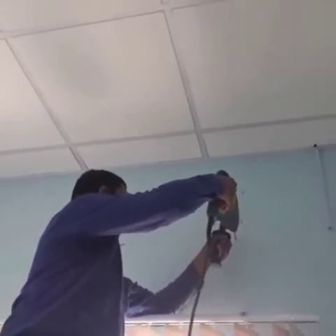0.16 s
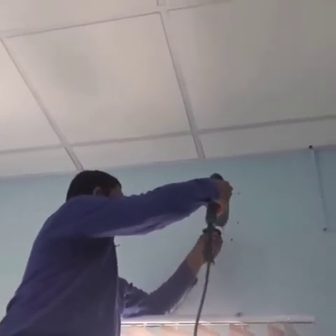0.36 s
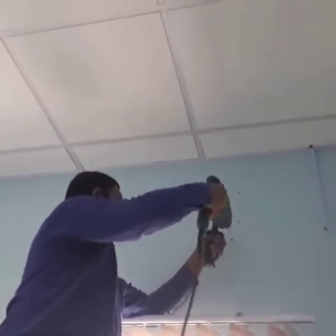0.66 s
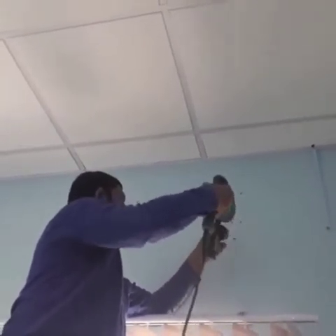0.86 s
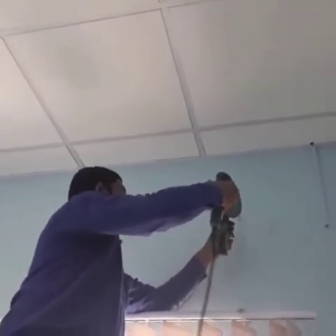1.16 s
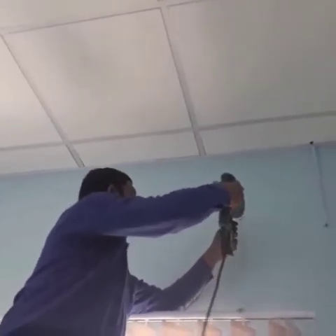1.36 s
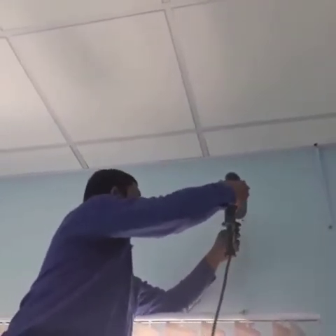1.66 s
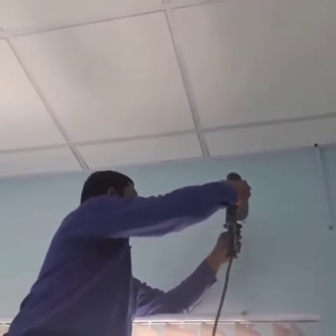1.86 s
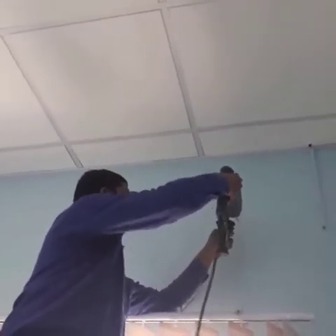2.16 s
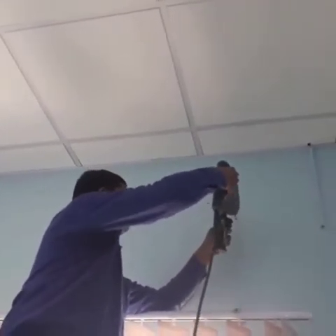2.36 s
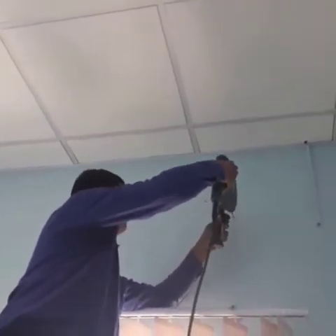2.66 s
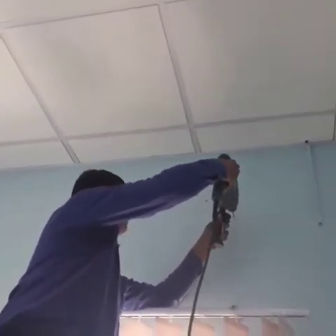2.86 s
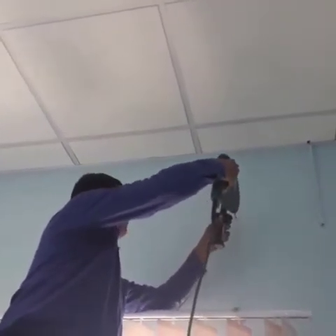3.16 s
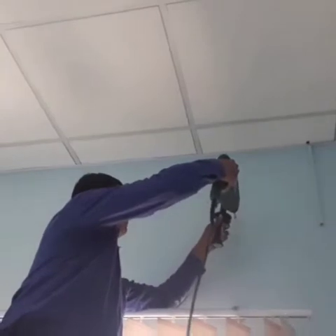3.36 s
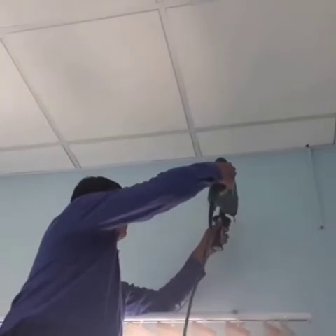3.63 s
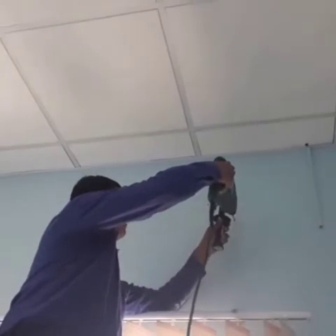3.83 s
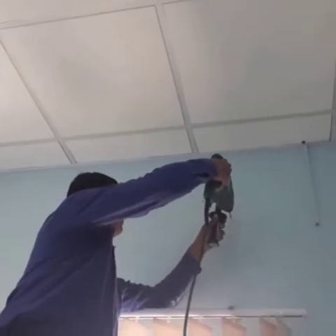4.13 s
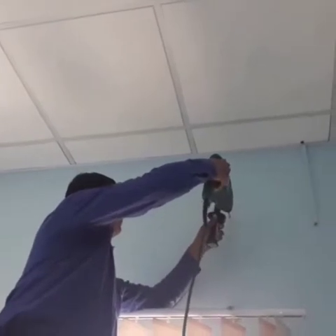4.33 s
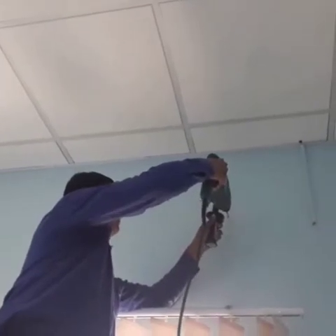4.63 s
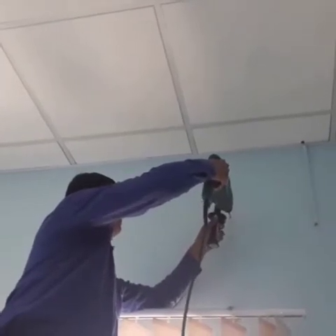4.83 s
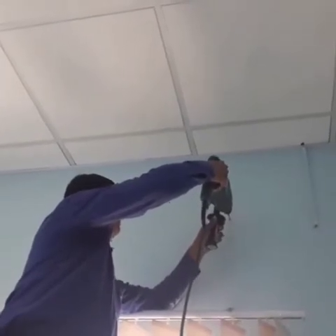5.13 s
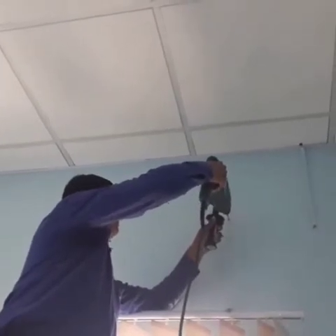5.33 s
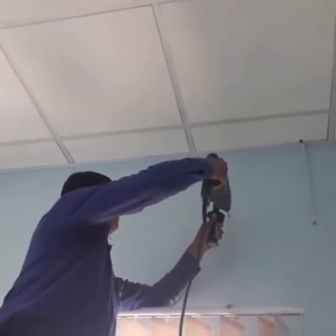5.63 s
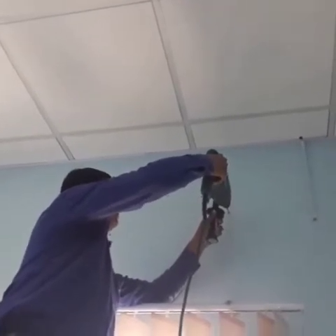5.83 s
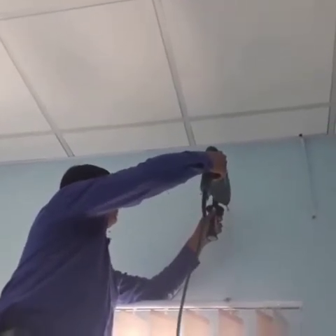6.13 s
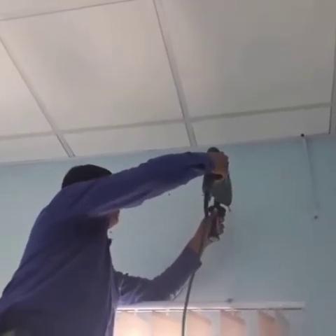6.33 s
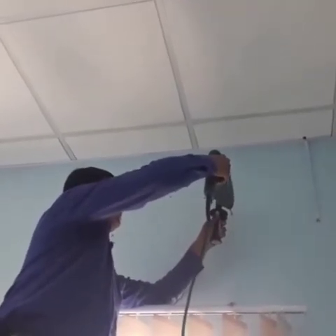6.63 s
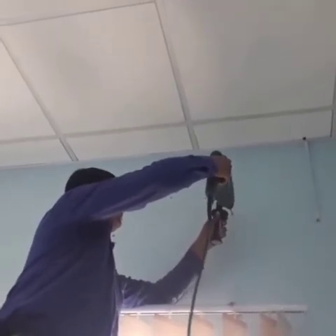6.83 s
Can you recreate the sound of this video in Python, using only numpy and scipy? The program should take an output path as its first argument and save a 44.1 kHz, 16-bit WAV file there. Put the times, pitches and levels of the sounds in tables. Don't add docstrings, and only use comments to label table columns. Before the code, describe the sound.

In a bare, reverberant room, a power drill coasts to a stop, scrapes and knocks, then restarts with rapid trigger squeezes and gritty grinding.

```python
import sys
import numpy as np
from scipy import signal
from scipy.fft import rfft, irfft, next_fast_len
from scipy.io import wavfile
from scipy.ndimage import uniform_filter1d

SR = 44100
rng = np.random.default_rng(int(sys.argv[2]) if len(sys.argv) > 2 else 0)


def elevation(decibels):
    levels = np.asarray(decibels, float)
    return 10 ** (levels / 20)


def unload_wav(signal):
    wavfile.write(
        sys.argv[1],
        SR,
        np.round(np.clip(np.atleast_2d(signal).T, -1, 1) * 32767).astype(np.int16),
    )


N = 308259
TIME = np.arange(N) / SR
GRIT_SPLIT_HZ = 6500

# freq_hz, level_db
HOUSING_SPECTRUM = [(35, -63), (60, -27), (227, -16.5), (269, -18.5), (311, -12.5), (427, -12.5),
                    (477, -11.5), (690, -6.5), (815, -12.5), (894, -4), (1740, 0), (2620, -5.5),
                    (5000, -17.5), (6500, -36), (11000, -120)]


def unit(x):
    return x / np.sqrt(np.mean(x ** 2))


def colour(x, points):
    hz, db = np.transpose(points)
    size = next_fast_len(len(x))
    f = np.maximum(np.fft.rfftfreq(size, 1 / SR), 1)
    gain = elevation(np.interp(np.log(f), np.log(hz), db))
    return irfft(rfft(x, size) * gain, size)[:len(x)]


def ring(x, hz, width_hz):
    return signal.lfilter(*signal.iirpeak(hz, hz / width_hz, fs=SR), x)


def split(x, hz, kind):
    return signal.sosfilt(signal.butter(4, hz, kind, fs=SR, output="sos"), x)


def walk(rate):
    k = int(SR / rate)
    steps = np.repeat(rng.standard_normal(N // k + 1), k)
    return unit(uniform_filter1d(uniform_filter1d(steps, k), k)[:N])


def grains(spread_db):
    size_db = spread_db * np.minimum(rng.exponential(size=N), 5)
    return unit(rng.standard_normal(N) * elevation(size_db))


def lag(x, seconds):
    share = 1 / (seconds * SR)
    return signal.lfilter([share], [1, share - 1], x - x[0]) + x[0]


def by_speed(hz, table):
    at_hz, *rest = np.transpose(table)
    return [np.interp(np.log(hz), np.log(at_hz), column) for column in rest]


def coast(start_hz, t):
    friction_hz_per_s, drag_per_s = 2750, .53
    rest = friction_hz_per_s / drag_per_s
    return np.maximum((start_hz + rest) * np.exp(-drag_per_s * t) - rest, 1)


def speed():
    # on_s, off_s, reached_hz, spin_up_s
    pulls = [(3.01, 3.074, 702, 0.24), (3.074, 3.273, 5800, .021), (3.855, 4.092, 6510, 0.083),
             (4.476, 4.635, 8660, 0.0599), (4.833, 4.945, 9180, .04), (5.115, 5.255, 9630, 0.065),
             (5.336, 5.5, 10200, .15), (5.62, 5.765, 10360, 0.076), (5.876, 6.019, 10290, .1),
             (6.155, 6.285, 9940, 0.069), (6.4, 6.579, 10150, .14), (6.662, 6.805, 10140, 0.11),
             (6.907, 7.05, 9800, 0.073)]
    hz, powered = coast(4900, TIME), np.zeros(N)
    for on, off, top, rise in pulls:
        before = hz[int(on * SR)]
        progress = np.expm1(-np.maximum(TIME - on, 0) / rise) / np.expm1(-(off - on) / rise)
        climb = before + (top - before) * progress
        after = np.where(TIME < off, climb, coast(top, TIME - off))
        hz = np.where(TIME < on, hz, after)
        powered[(TIME >= on) & (TIME < off)] = 1
    return uniform_filter1d(hz, 1500), lag(powered, 0.056)


def motor(hz):
    # whine_hz, level_db
    whine_out = [(4000, -39), (4550, -31), (5750, -23.5), (6350, -24.5), (7300, -22), (8400, -15.5),
                 (9250, -20.5), (10200, -23.5)]
    bar_count, sideband_db = 24, -7
    mesh_ratio, mesh_db = .419, -7
    strain_db, strain_hz_per_s = -1, 21000
    strain = np.clip(np.gradient(hz) * SR / strain_hz_per_s, 0, 1)
    gain = elevation(by_speed(hz, whine_out)[0] - 1.0 + strain_db * strain)
    gain = gain * np.minimum(hz / whine_out[0][0], 1) ** 2
    bars = 2 * np.pi * np.cumsum(hz) / SR
    shaft = bars / bar_count
    shiver = 2 * np.pi * np.cumsum((40 + hz * .005) * walk(rate=300)) / SR
    sidebands = 1 + 2 * elevation(sideband_db) * np.cos(shaft)
    whine = elevation(3.2 * walk(rate=120)) * np.sin(bars + shiver) * sidebands
    mesh_gain = elevation(mesh_db + 2.0 * walk(rate=120)) * np.clip(hz / 9000, .8, 2) ** 3
    mesh = mesh_gain * np.sin(mesh_ratio * (bars + 1.9 * shiver))
    return np.sqrt(2) * gain * (whine + mesh), shaft


def body(x, air_db):
    # freq_hz, width_hz, level_db
    modes = [(821, 45, -14.5), (1556, 32, -20.5), (1795, 140, -12), (2130, 170, -17.5), (3560, 140, -23),
             (8750, 210, -19)]
    total = 0
    for hz, width_hz, db in modes:
        level_db = db + 1.2 * walk(rate=16) + (hz > GRIT_SPLIT_HZ) * air_db
        total = total + elevation(level_db) * unit(ring(x, hz, width_hz))
    return total


def drill_noise(shaft, hz, powered):
    # commutator_hz, clatter_db, grit_over_clatter_db, air_over_clatter_db
    noise_levels = [(12, -80, -4, -8), (407, -44, -6.5, -14), (1380, -28, -7.5, -14), (3340, -24.5, -3, -6),
                    (4640, -21, 0, -3.5), (6000, -18, 0, -1), (9900, -17, 0, 2)]
    # time_s, noise_change_db
    lean = [
        (4.45, -.5),
        (4.62, 1),
        (5.05, 0),
        (5.26, 1.5),
        (5.45, 0),
        (5.85, -1),
        (6.13, -1),
        (6.5, -1),
        (6.77, 0.5),
        (6.99, 0),
    ]
    # time_s, clatter_change_db
    jolts = [
        (.025, 1),
        (.075, -14),
        (.318, -9),
        (.41, 4),
        (3.57, 5),
        (4.48, -2),
    ]
    # time_s, treble_change_db, half_length_s
    slack = [(.06, -7, 0.01), (0.24, -3, 0.01), (0.298, 1.5, 0.011), (0.375, -1, .014),
             (0.542, -9.5, 0.017), (0.812, -7, 0.015), (0.957, -1, .02), (1.055, -5, 0.022),
             (3.661, -2, 0.018), (3.728, -9, 0.011), (4.213, -2, 0.01)]
    # freq_hz, level_db
    treble = [(1180, -41), (2000, -0.5), (2310, -6), (2570, -4.5), (2920, -6), (3420, -4), (4280, -6.5),
              (5100, -7.5), (7830, -3), (8640, 1), (9600, -5.5), (10900, -4), (12100, -9), (15800, -43),
              (22000, -120)]
    jolt_s = 0.011
    clatter_db, grit_db, air_db = by_speed(lag(hz, 0.023), noise_levels)
    clatter_db = clatter_db + np.interp(TIME, *np.transpose(lean))
    jolt = elevation(sum(db * np.exp(-((TIME - s) / jolt_s) ** 2) for s, db in jolts))
    teeth = grains(spread_db=2.5) * (1 + 0.22 * np.cos(shaft))
    clatter = unit(colour(teeth, HOUSING_SPECTRUM)) * elevation(0.55 * walk(rate=17))
    high = colour(grains(spread_db=2.0) * (1 + 0.022 * np.cos(shaft)), treble)
    slack_db = sum(db * np.exp(-((TIME - s) / half_s) ** 2) for s, db, half_s in slack)
    chatter_db = slack_db + 0.93 * walk(rate=45)
    grit = unit(split(high, GRIT_SPLIT_HZ, "low")) * elevation(grit_db + 1.0 + chatter_db)
    air_level_db = air_db - 2.5 + chatter_db + 0.84 * walk(rate=50)
    air = unit(split(high, GRIT_SPLIT_HZ, "high")) * elevation(air_level_db)
    shaken = jolt * (clatter + body(teeth, air_db))
    level = elevation(clatter_db - 0.5 + 0.2 * powered)
    return level * (hz > 2) * (shaken + grit + air)


def background():
    # freq_hz, level_db
    tone_spectrum = [(15, -30), (30, -11), (70, -13), (130, -4.5), (250, -5.5), (420, -12), (900, -23.5),
                     (1600, -23), (3000, -26), (12100, -39.5), (16000, -80)]
    # freq_hz, width_hz, level_db
    fan = [(103, 5.4, -60.5), (169, 9.9, -61), (213, 7.7, -59.5), (502, 2.8, -63.5), (637, 7.2, -64)]
    tone_db = -50.5 + 1 + 1.2 * walk(rate=2.1)
    tone = elevation(tone_db) * unit(colour(rng.standard_normal(N), tone_spectrum))
    hum = sum(elevation(db) * unit(ring(rng.standard_normal(N), hz, width_hz)) for hz, width_hz, db in fan)
    phase = 2 * np.pi * 160.5 * TIME + .5 * walk(rate=8)
    return tone + hum + elevation(-50 + 1.7 * walk(rate=15)) * np.sin(phase)


def scraping():
    # start_s, held_s,
    # level_db, treble_over_level_db
    scrapes = [(1.085, 0.033, -40, -10), (1.2, 0.23, -52, -0.5), (1.488, 0.045, -42.5, -9.5),
               (1.81, .02, -53, 1), (1.836, 0.049, -44.5, -6), (1.925, 0.016, -52.5, 8.5),
               (2.0, .95, -59.5, 1), (2.15, 0.16, -57.5, 3), (2.32, 0.029, -53, 6), (2.42, 0.047, -46, -3),
               (2.555, 0.041, -49, -5), (2.617, .2, -48, 9.5), (2.95, .02, -52, -15), (3.012, .01, -50, -3),
               (3.044, .02, -53, 10)]
    rise_s, fall_db_per_s = 0.0062, 106
    low, top = 0, 0
    for s, held_s, db, treble_db in scrapes:
        fade_db = -fall_db_per_s * np.maximum(TIME - s - held_s, 0)
        power = (np.clip((TIME - s) / rise_s, 0, 1) * elevation(db + fade_db)) ** 2
        low = low + power
        top = top + power * elevation(2 * treble_db)
    return np.sqrt(low), np.sqrt(top)


def handling():
    # freq_hz, level_db
    scrape_spectrum = [(1470, -2.5), (2500, 3), (2800, -9), (2930, -13), (4270, -7), (4530, -5), (6920, 2),
                       (8950, 0.5), (9690, -6), (11100, -0.5), (12100, -7), (15800, -37), (22000, -120)]
    # time_s, peak_db, ring_db
    taps = [
        (1.491, -32, -40),
        (1.835, -28, -45),
        (1.929, -33, -43.5),
        (2.415, -34, -58),
        (2.627, -28, -40),
    ]
    low, top = scraping()
    rub = grains(spread_db=2.5)
    rub_body = unit(colour(rub, HOUSING_SPECTRUM)) + elevation(-9) * unit(ring(rub, 821, 27))
    scrape = low * rub_body + top * unit(colour(rub, scrape_spectrum))
    blows, rung = np.zeros(N), np.zeros(N)
    t = np.arange(SR // 2) / SR
    pair = np.sin(2 * np.pi * 828 * t) + 0.35 * np.sin(2 * np.pi * 790 * t)
    panel = pair * elevation(-2.5 - 60 * t / 0.4) * np.minimum(t / .004, 1)
    for s, db, ring_db in taps:
        i = int(s * SR)
        burst = np.exp(-t / 0.0034) * rng.standard_normal(len(t))
        blows[i:i + len(t)] += elevation(db) * burst / np.max(np.abs(burst))
        rung[i:i + len(t)] += elevation(ring_db) * panel
    return elevation(-3.5) * scrape + elevation(3.5) * ring(blows, 1800, 2700) + rung


def tail():
    t60_s, top_t60_s = .55, .3
    wet_db, wet_top_db = -4, -7
    t = np.arange(SR // 2) / SR
    noise = rng.standard_normal(SR // 2)
    low = split(noise, 2720, "low")
    low_part = low * elevation(-60 * t / t60_s) * np.sqrt(2 * np.log(1000) / t60_s / SR)
    top_decay = elevation(wet_top_db - 60 * t / top_t60_s)
    top_part = (noise - low) * top_decay * np.sqrt(2 * np.log(1000) / top_t60_s / SR)
    return elevation(wet_db) * (low_part + top_part) * np.minimum(t / 0.0031, 1)


def room(x):
    sway = 2.5 * walk(rate=5)
    lead = SR // 2
    wet = 0
    for share in (np.cos(sway), np.sin(sway)):
        sent = x * share
        path = np.r_[sent[lead:0:-1], sent]
        wet = wet + signal.fftconvolve(path, tail())[lead:lead + N]
    return x + wet


def scene():
    hz, powered = speed()
    tones, shaft = motor(hz)
    drill = tones + drill_noise(shaft, hz, powered)
    mono = room(elevation(-1.0) * (drill + handling())) + background()
    patches = uniform_filter1d(1. * (walk(rate=30) > 1.0), 500)
    side = elevation(-21.5) * patches * split(np.roll(mono, 700), 4200, "high")
    return np.array([mono + side, mono - side])


def top_cut(x):
    return signal.sosfilt(signal.butter(12, 12280, fs=SR, output="sos"), x)


def record(dry):
    rounded = 1.306 * np.tanh(dry / 1.22)
    thinned = signal.sosfilt(signal.butter(1, 70, "high", fs=SR, output="sos"), rounded)
    cut = signal.sosfilt(signal.ellip(10, .2, 70, 12420, fs=SR, output="sos"), thinned)
    return top_cut(np.clip(cut, -1, 1))


dry = scene()
out = record(dry)
unload_wav(out)
```